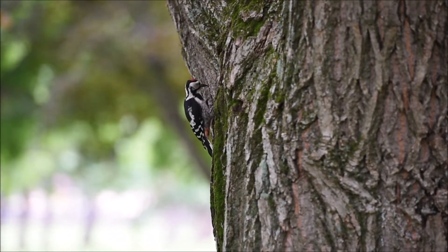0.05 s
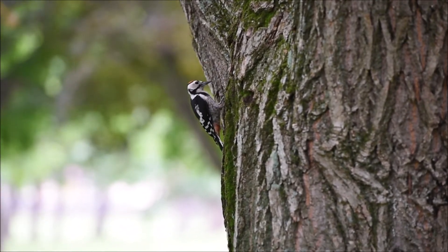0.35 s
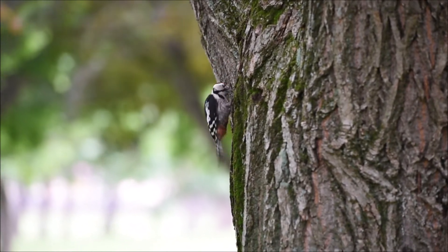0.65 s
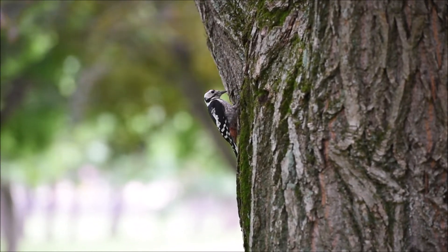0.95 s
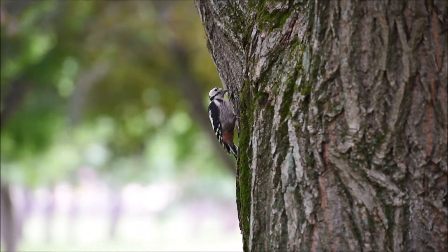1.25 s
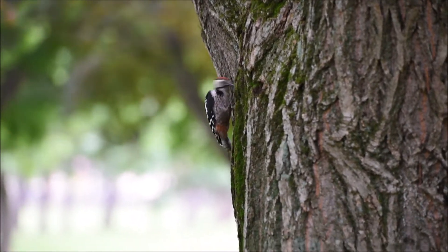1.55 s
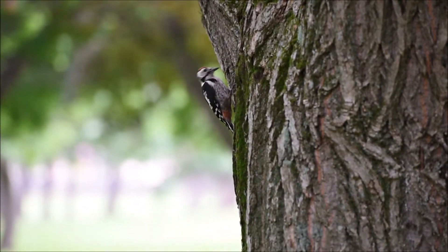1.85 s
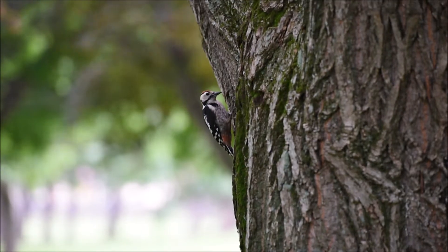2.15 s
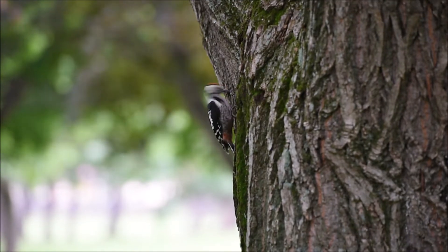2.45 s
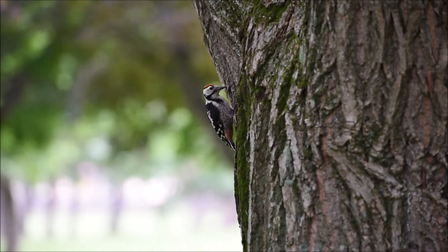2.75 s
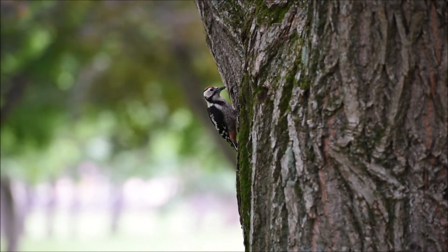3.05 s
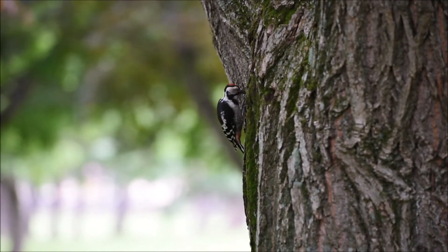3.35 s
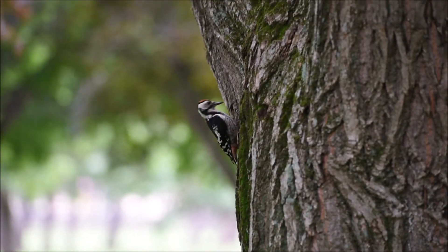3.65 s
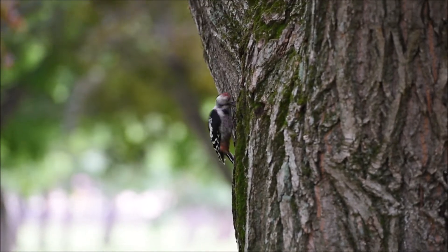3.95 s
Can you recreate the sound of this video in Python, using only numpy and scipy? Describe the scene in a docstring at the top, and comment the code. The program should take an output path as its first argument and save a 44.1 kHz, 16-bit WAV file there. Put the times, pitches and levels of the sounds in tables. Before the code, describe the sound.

A woodpecker knocks slowly on a tree trunk, with wind gusts rumbling on the microphone.

```python
"""In a park, a woodpecker pecks at a thick trunk: slow, dull knocks, each doubled at once by its echo
from the ground. Leaves and the town make a steady hush; a crow caws and small birds whistle far off.
Bark rustles as the woodpecker shifts. Gusts buffet the microphone, and the strongest overloads it.
The recorder adds a faint, high whine."""
import sys
import numpy as np
from scipy import signal
from scipy.fft import rfft, irfft
from scipy.io import wavfile

SR = 44100
rng = np.random.default_rng(int(sys.argv[2]) if len(sys.argv) > 2 else 0)


def persist_wave(psi):
    """Save psi, clipped to +-1, as 16-bit WAV."""
    counts = np.round(np.clip(psi, -1, 1) * 32767).astype(np.int16)
    wavfile.write(sys.argv[1], SR, np.atleast_2d(counts).T)


N = 176400
T = np.arange(N) / SR
CALL_T60_S, CALL_SCATTER_DB = .8, -1.5   # echo of far calls; t60 is the time to fade by 60 dB


def from_db(db):
    """Turn decibels into a number to multiply a sound by."""
    return 10 ** (np.asarray(db) / 20)


def rms_one(x):
    """Scale a signal so that its average strength (rms) is 1."""
    return x / np.sqrt(np.mean(x ** 2) + 1e-20)


def in_time(rows):
    """Join (t/s, value) points with straight lines, giving a value for every sample."""
    return np.interp(T, *np.transpose(rows))


def filtered(x, hz, kind, order=2):
    """Keep the "low" part, the "high" part or one "band" of a sound."""
    return signal.sosfilt(signal.butter(order, hz, kind, fs=SR, output="sos"), x + 1e-18)


def drift(rate_hz):
    """A smooth random wobble of size about 1; a higher rate wobbles faster."""
    step = 40   # samples per random value
    r = np.exp(-2 * np.pi * step * rate_hz / SR)
    slow = signal.lfilter([1], [1, -2 * r, r * r], rng.standard_normal(N // step + 2002))[2000:]
    return np.interp(np.arange(N) / step, np.arange(len(slow)), rms_one(slow))


def add(out, s, sound):
    """Mix a sound in, starting at s seconds."""
    start = int(np.clip(s * SR, 0, N - 1))
    out[start:start + len(sound)] += sound[:N - start]


def noise_bands(count):
    """Slices of noise, each half an octave wide, from 22.5 Hz up, as (middle f/Hz, noise)."""
    edges = 22.5 * 2 ** (np.arange(count + 1) / 2)
    return [(np.sqrt(low * high), filtered(rng.standard_normal(N + SR), [low, high], "band")[SR:])
            for low, high in zip(edges, edges[1:])]


def hush():
    """Far leaves and the town blur into a steady noise whose middle range swells gently."""
    # tone of the hush, from low to high: f/Hz, relative level/dB
    tone = [(30, 0), (120, -10.5), (250, -13.5), (450, -19), (800, -16.5), (1200, -17.5), (1900, -17.5),
            (3000, -26), (4500, -31.5), (7000, -36.5), (10000, -42), (14000, -45), (15700, -47)]
    # rise and fall at the centre of the swell: t/s, level change/dB
    swell = [(0, -2), (.5, 0.5), (1.2, -1.5), (2.15, 4.5), (2.7, -0.5), (3.3, 1), (4, 2.5)]
    swell_hz, swell_octaves = 2360, .34
    hush_db, flicker_db = -52, 1
    tone_hz, tone_db = np.transpose(tone)
    swell_db, out = in_time(swell), 0
    for hz, noise in noise_bands(count=19):
        band_db = np.interp(np.log(hz), np.log(tone_hz), tone_db)
        share = np.exp(-.5 * (np.log2(hz / swell_hz) / swell_octaves) ** 2)
        out += noise * from_db(band_db + share * swell_db + flicker_db * drift(7.8))
    return from_db(hush_db) * rms_one(out)


def eddies(length, low_hz, high_hz, steepness, even_s):
    """Swirling air: noise that falls off gently below low_hz and steeply above high_hz."""
    hz = np.arange(length // 2 + 1) * SR / length + 1e-3
    gain = 1 / np.sqrt((1 + (low_hz / hz) ** 4) * (1 + (hz / high_hz) ** (2 * steepness)))
    rumble = irfft(rfft(rng.standard_normal(length)) * gain, length)
    # hold the level near 1 over each stretch of about even_s seconds
    window = signal.windows.hann(int(2 * even_s * SR))
    power = signal.fftconvolve(rumble ** 2, window / window.sum(), "same")
    return rumble / np.sqrt(np.abs(power) + 1e-14)


def wind():
    """A low rumble follows the breeze; single swirls hit the microphone as short, soft thumps."""
    # strength of the breeze at the microphone: t/s, level/dB
    breeze = [(0, -46.5), (.3, -54.5), (.6, -50), (.9, -54.5), (1.17, -50), (1.28, -36.5), (1.42, -45),
              (1.52, -50.5), (1.75, -54.5), (2.0, -50.5), (2.4, -52.5), (2.6, -45), (2.75, -41.5),
              (3.03, -41), (3.12, -27.5), (3.28, -32), (3.37, -17), (3.45, -25.5), (3.55, -30), (3.7, -36),
              (4, -38.5)]
    # single thumps of air: peak t/s, level/dB, half-width/s, upper edge f/Hz
    buffets = [(1.235, -25.5, .011, 119), (1.264, -30, 0.0049, 149), (1.346, -38, 0.011, 101),
               (1.59, -37, 0.0072, 75), (2.499, -38, 0.0069, 85), (2.591, -27, 0.0094, 92),
               (2.693, -35.5, 0.02, 79.5), (2.764, -35, 0.0087, 190), (2.812, -29.5, 0.0045, 139),
               (2.925, -27.5, 0.008, 133), (2.968, -36.5, 0.0053, 150), (3.106, -22, 0.019, 113),
               (3.127, -25.5, 0.0029, 220), (3.19, -21, 0.0066, 198), (3.228, -31, 0.014, 140),
               (3.324, -16, 0.012, 234), (3.352, -7.5, 0.0091, 217), (3.371, -11, 0.0051, 290),
               (3.39, -16, 0.018, 80), (3.406, -16.5, .005, 330), (3.429, -25.5, 0.005, 300),
               (3.453, -25, 0.0042, 367), (3.494, -22, 0.0044, 168), (3.522, -26, 0.0078, 149),
               (3.596, -26, 0.006, 127), (3.657, -29, 0.0084, 112), (3.726, -37.5, .009, 180),
               (3.763, -32.5, .013, 69), (3.874, -34, 0.0077, 174), (3.997, -31.5, 0.013, 90)]
    out = from_db(in_time(breeze)) * eddies(N, low_hz=35, high_hz=94.3, steepness=3.46, even_s=.035)
    t = T[:SR // 2] - .25   # time from a thump's peak
    for s, db, width, edge_hz in buffets:
        # quick rise, slower fall
        swell = np.where(t < 0, np.exp(-.5 * (t / width) ** 2), 1 / np.cosh(t / width))
        burst = eddies(len(t), low_hz=.1 * edge_hz, high_hz=edge_hz, steepness=3.41, even_s=.019)
        add(out, s + t[0], from_db(db) * swell * burst)
    return filtered(out, 28, "high")   # the microphone misses the deepest rumble


def among_trees(x, t60, scatter_db):
    """Trees scatter a sound, adding a soft, fading tail of echoes."""
    tail = rng.standard_normal(SR) * from_db(-60 * T[:SR] / t60)
    return x + from_db(scatter_db) * signal.fftconvolve(x, tail / np.linalg.norm(tail))[:N]


def crow():
    """One hoarse, far caw: unsteady overtones, of which the throat lets mainly one through."""
    # course of the caw: t/s, pitch f/Hz, level/dB
    caw = [(.2, 307.2, -85), (.235, 312, -57), (.3, 324, -59), (.33, 323, -57.5), (.36, 332.2, -56.5),
           (.43, 321, -59), (.6, 321, -67.5)]
    throat_hz, throat_width_hz = 1285, 240
    jitter, rasp = .018, .47   # wobble of pitch and of loudness, as fractions
    s, hz, db = np.transpose(caw)
    pitch = np.interp(T, s, hz) * (1 + jitter * drift(102))
    phase = 2 * np.pi * np.cumsum(pitch) / SR
    voice = sum(np.sin(k * phase) / np.hypot(1, 2 * (k * pitch - throat_hz) / throat_width_hz)
                for k in range(2, 7))
    hoarse = rms_one(voice * (1 + rasp * drift(50)))
    level = from_db(np.interp(T, s, db)) * (T > s[0]) * (T < s[-1])
    return among_trees(level * hoarse, CALL_T60_S, CALL_SCATTER_DB)


def far_birds():
    """Small birds sing gliding whistles, blurred on their way through the trees."""
    # whistles: t/s, length/s, start f/Hz, middle f/Hz, end f/Hz, level/dB, pitch blur/Hz
    calls = [(.305, 0.037, 5600, 5300, 4900, -63, 100), (0.714, .04, 5450, 5350, 5250, -62, 100),
             (1.303, .1, 6450, 6500, 6550, -74, 100), (2.741, 0.083, 7600, 7180, 7050, -64.5, 130),
             (2.8, 0.1, 7150, 6940, 7100, -69, 150), (2.89, 0.087, 7050, 6900, 6850, -66.5, 120),
             (3.047, 0.056, 7500, 7500, 7500, -70, 40.4), (3.08, 0.051, 7200, 7100, 6850, -67.5, 110),
             (3.78, 0.086, 5220, 5380, 5550, -65, 30), (3.81, .06, 8050, 8300, 8250, -71, 70),
             (3.817, .06, 6970, 6840, 6650, -72, 80), (3.93, .07, 5220, 5500, 5750, -71, 40)]
    fade_s = .027
    out = np.zeros(N)
    for s, length, start_hz, middle_hz, end_hz, db, blur_hz in calls:
        t = T - s
        glide = np.interp(t, [0, length / 2, length], [start_hz, middle_hz, end_hz])
        phase = 2 * np.pi * np.cumsum(glide + blur_hz * drift(250)) / SR
        fade = np.clip(np.minimum(t, length - t) / fade_s, 0, 1)
        out += from_db(db) * fade * np.sin(phase)
    return among_trees(out, CALL_T60_S, CALL_SCATTER_DB)


def ring(push, hz, t60):
    """A push sets wood ringing with one fading tone."""
    decay, turn = from_db(-60 / (t60 * SR)), 2 * np.pi * hz / SR   # both per sample
    return signal.lfilter([0, np.sin(turn)], [1, -2 * decay * np.cos(turn), decay ** 2], push + 1e-18)


def woodpecker():
    """The bill briefly rings the struck spot and the trunk and cracks the bark; the ground echoes it."""
    # pecks: t/s, level/dB, struck spot f/Hz, then relative levels: echo/dB, crack/dB, trunk/dB
    pecks = [(0.6349, -29, 1480, 3.5, -17.5, 4), (1.0687, -29.5, 1210, 5.5, -18.5, -3),
             (1.4877, -25.5, 1250, -1.5, -21, 0), (2.3646, -31, 1110, 1.5, -14, -6),
             (2.4962, -31, 1330, 0.5, -12.5, 8), (2.6308, -43.5, 1120, 3, -16, 7),
             (2.8950, -35.5, 1174, -4, -16, 1), (3.7368, -30, 1110, -6.5, -20, -9),
             (3.9762, -28.5, 1100, -8, -22, -10)]
    # the trunk's own tones: f/Hz, relative level/dB, t60/s
    trunk_tones = [(552, -14.5, 0.013), (817, -16.5, 0.0088), (1660, -9.5, 0.0056), (2360, -24, 0.0043)]
    contact_hz, crack_hz, knock_low_hz = 2150, 3800, 520
    spot_t60_s, crack_t60_s, echo_delay_s = .0093, .013, .002574
    out, t = np.zeros(N), T[:SR // 10]
    push = filtered(1. * (t == 0), contact_hz, "low")   # the bill's blow: a softened click
    trunk = sum(from_db(db) * (-1) ** (k // 2) * ring(push, hz, t60)   # the upper two start flipped
                for k, (hz, db, t60) in enumerate(trunk_tones))
    for s, db, spot_hz, echo_db, crack_db, trunk_db in pecks:
        crack = filtered(rng.standard_normal(len(t)), crack_hz, "low") * from_db(-60 * t / crack_t60_s)
        wood = from_db(trunk_db) * trunk + ring(push, spot_hz, spot_t60_s)
        knock = from_db(db) * filtered(wood + from_db(crack_db) * crack, knock_low_hz, "high")
        add(out, s, knock)
        add(out, s + echo_delay_s, from_db(echo_db) * knock)
    return among_trees(out, t60=.42, scatter_db=-13)


def bark_rustles():
    """Tiny dry flakes crackle as the bird shifts on the bark."""
    # rustles of bark: t/s, length/s, level/dB
    rustles = [(.89, .07, -71), (3.694, 0.3, -73), (3.825, .02, -76), (3.877, 0.012, -72)]
    flakes_per_s, band_hz = 2700, [6500, 11800]
    flakes = (rng.random(N) < flakes_per_s / SR) * rng.standard_normal(N)
    level = np.zeros(N)
    for s, length, db in rustles:
        progress = np.clip((T - s) / length, 0, 1)
        level += from_db(db) * np.sqrt(np.abs(np.sin(np.pi * progress)))
    return level * rms_one(filtered(flakes, band_hz, "band"))


def scene():
    """All the sounds meet at one microphone."""
    return (woodpecker() + wind() + hush() + crow() + far_birds() + bark_rustles())[None]


def record(dry):
    """The strongest gust is squashed; the recorder adds a thin whine and cuts the highest treble."""
    ceiling, hardness = .435, 10   # largest swing, and how abruptly it is reached
    whine_hz, whine_db, cutoff_hz = 15700, -65.5, 16000
    clipped = dry / (1 + np.abs(dry / ceiling) ** hardness) ** (1 / hardness)
    whine = from_db(whine_db) * np.sqrt(2) * np.sin(2 * np.pi * whine_hz * T)
    treble_cut = signal.ellip(12, .1, 90, cutoff_hz, fs=SR, output="sos")
    return signal.sosfilt(treble_cut, clipped + whine)


dry = scene()
out = record(dry)
persist_wave(out)
```